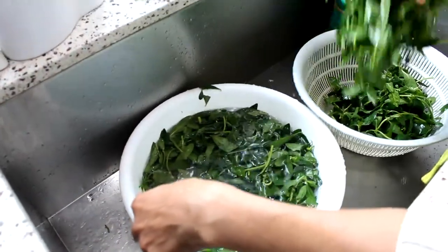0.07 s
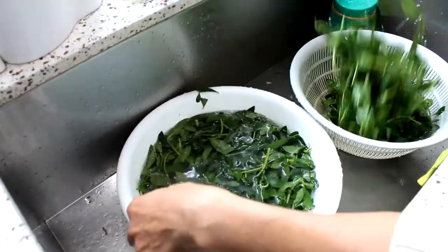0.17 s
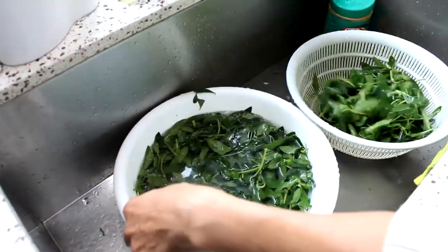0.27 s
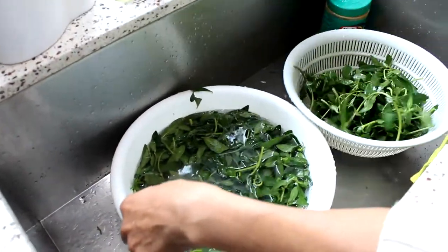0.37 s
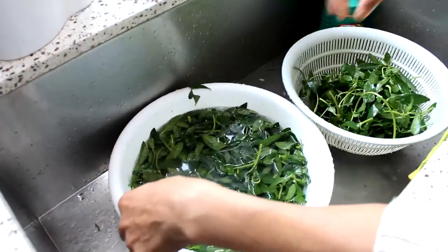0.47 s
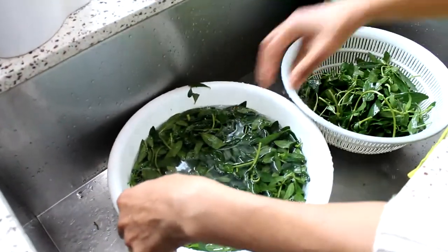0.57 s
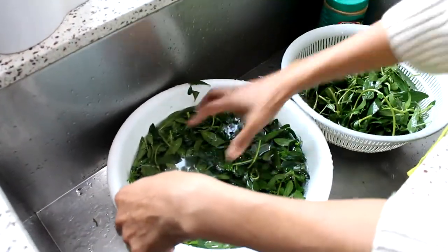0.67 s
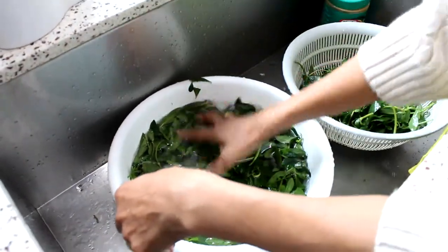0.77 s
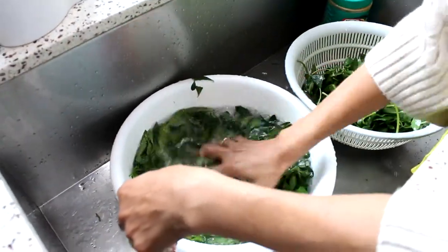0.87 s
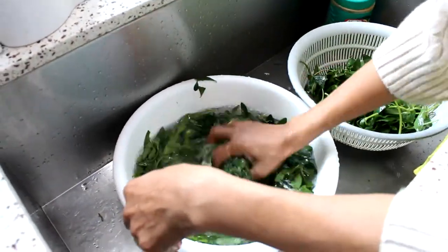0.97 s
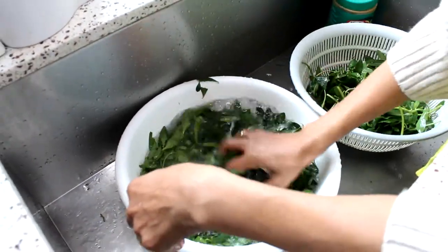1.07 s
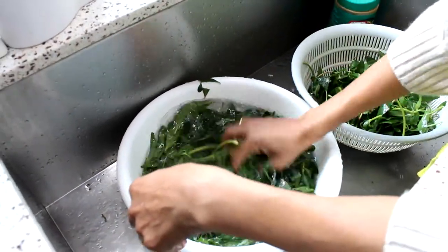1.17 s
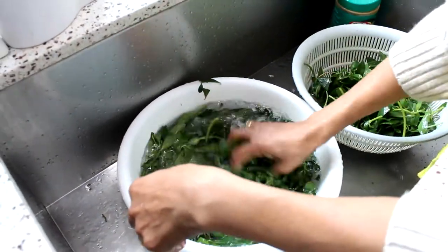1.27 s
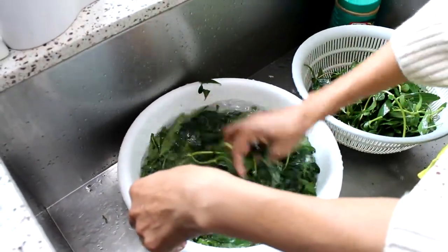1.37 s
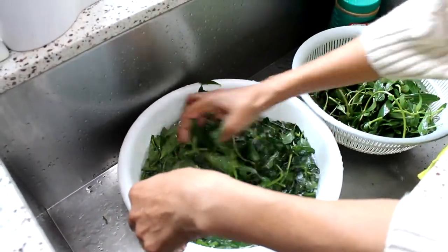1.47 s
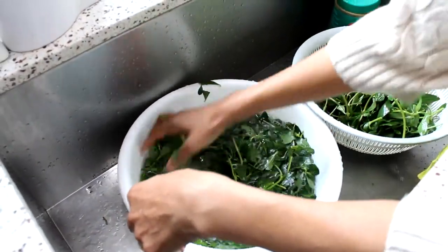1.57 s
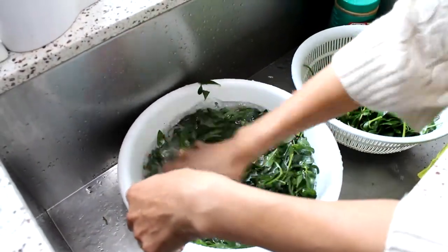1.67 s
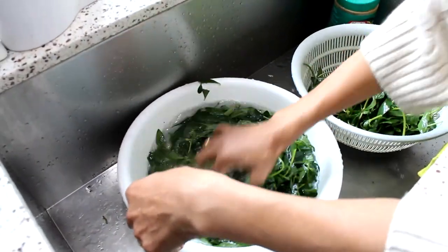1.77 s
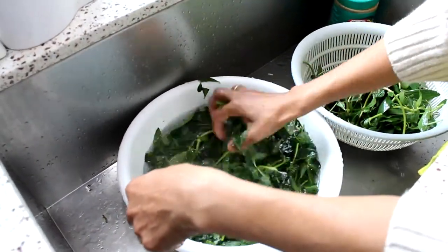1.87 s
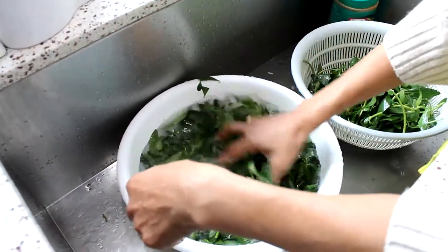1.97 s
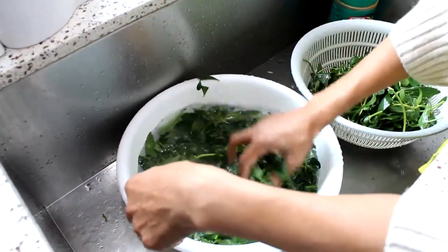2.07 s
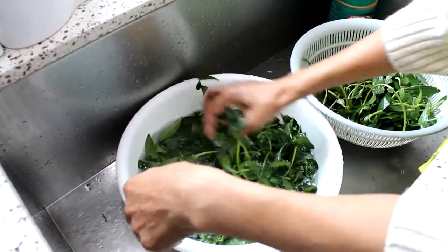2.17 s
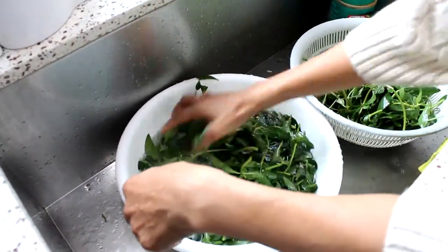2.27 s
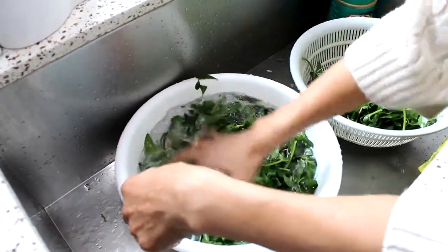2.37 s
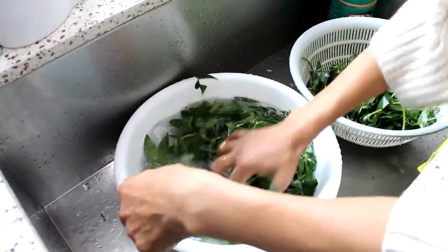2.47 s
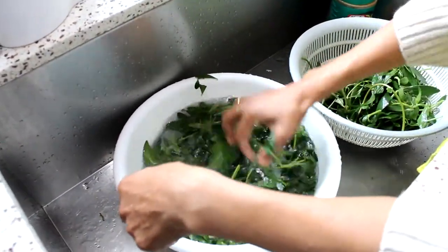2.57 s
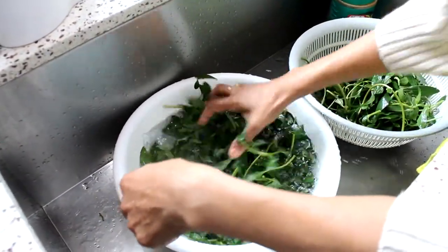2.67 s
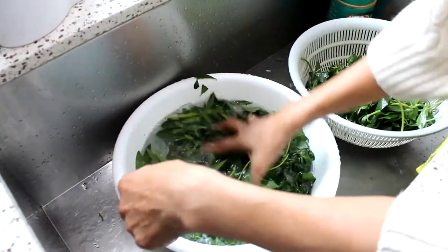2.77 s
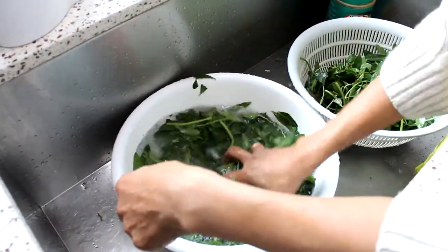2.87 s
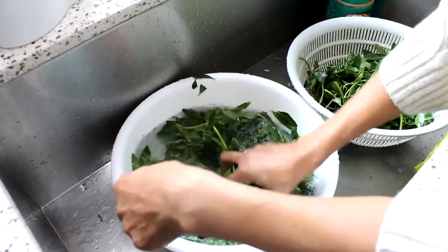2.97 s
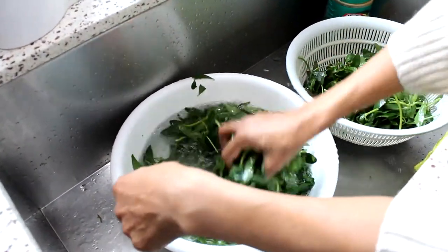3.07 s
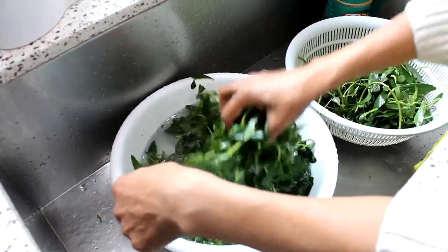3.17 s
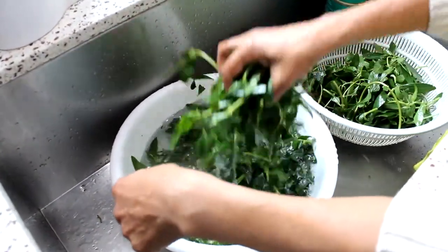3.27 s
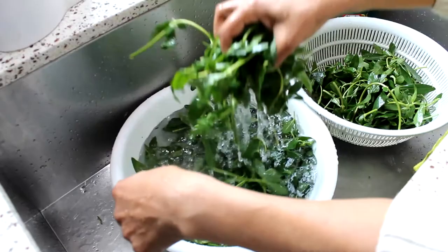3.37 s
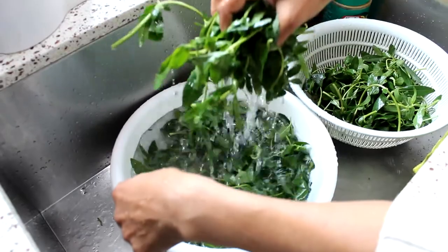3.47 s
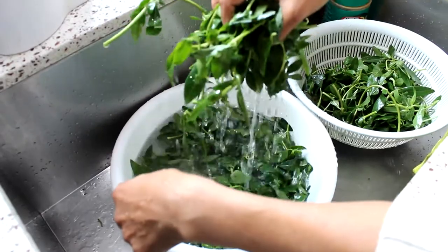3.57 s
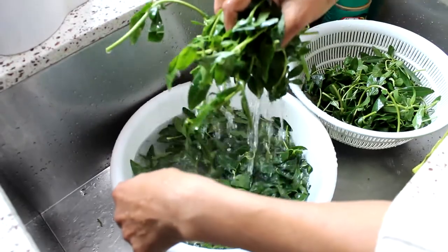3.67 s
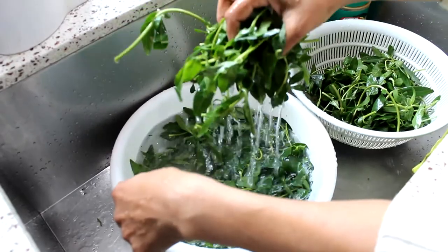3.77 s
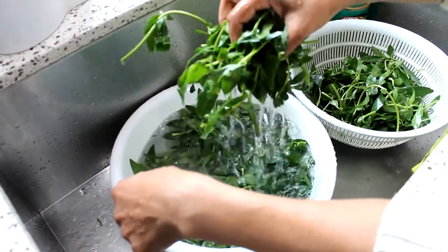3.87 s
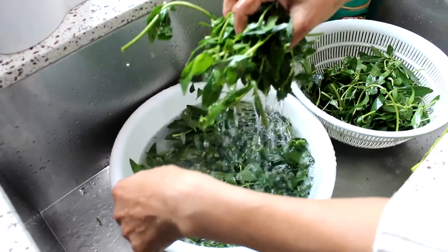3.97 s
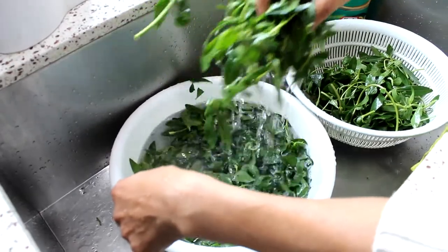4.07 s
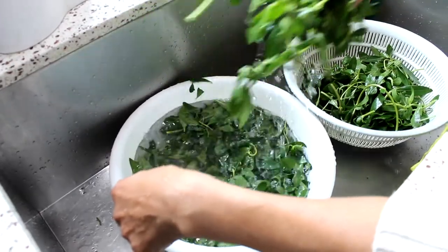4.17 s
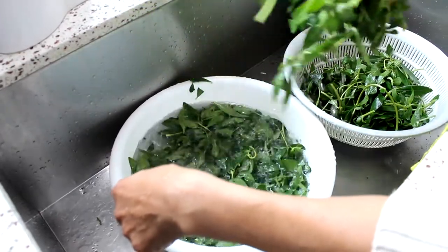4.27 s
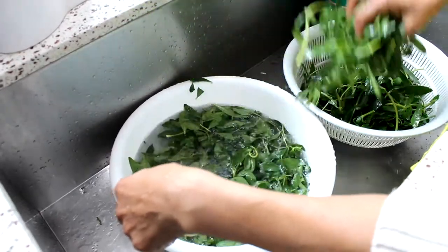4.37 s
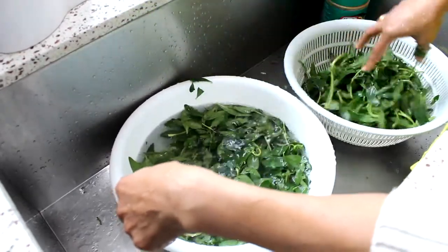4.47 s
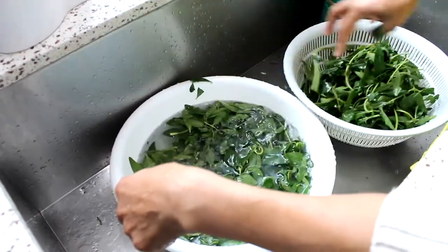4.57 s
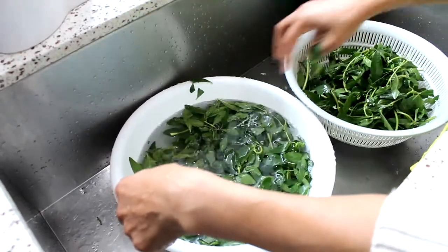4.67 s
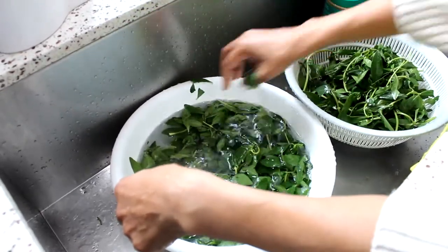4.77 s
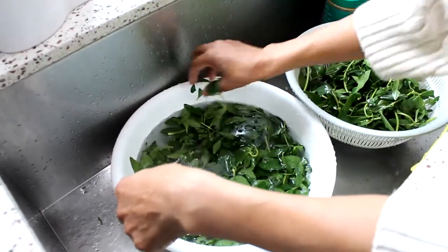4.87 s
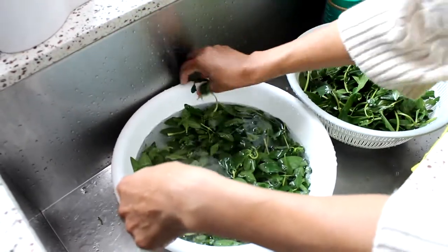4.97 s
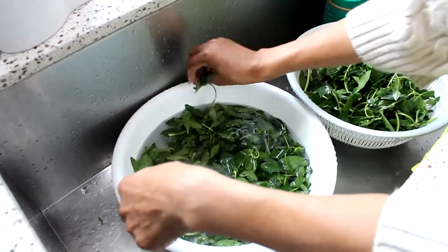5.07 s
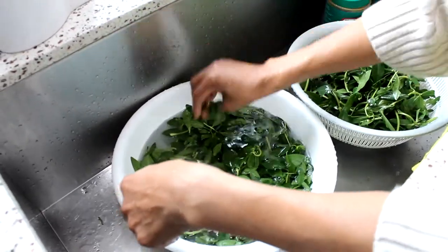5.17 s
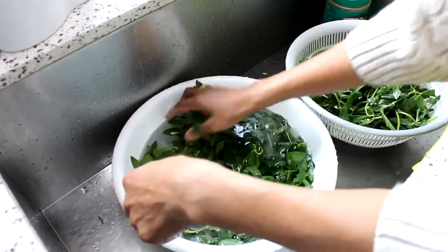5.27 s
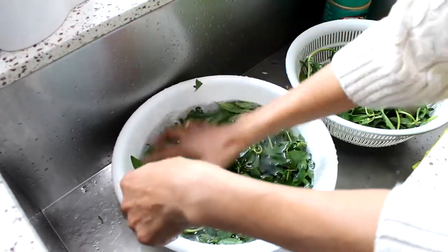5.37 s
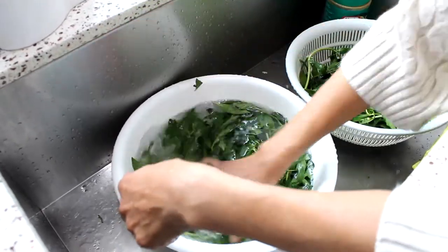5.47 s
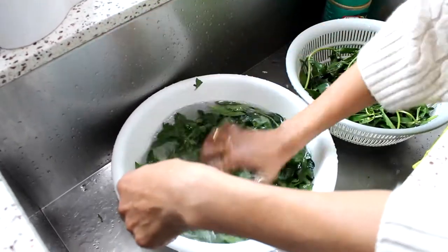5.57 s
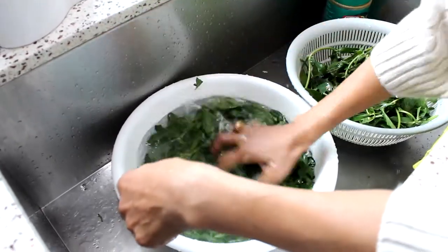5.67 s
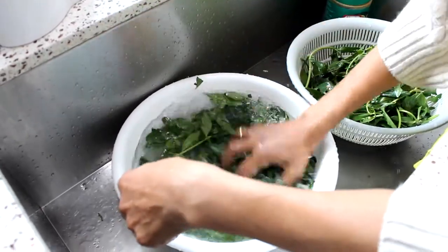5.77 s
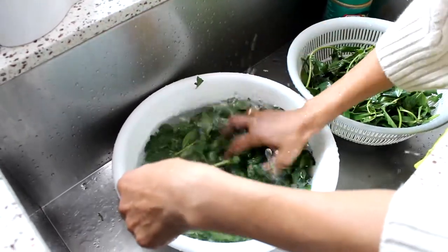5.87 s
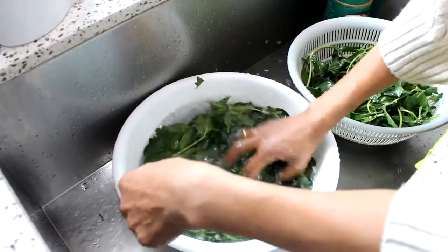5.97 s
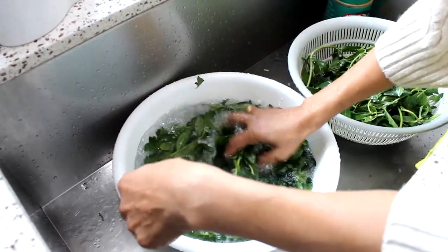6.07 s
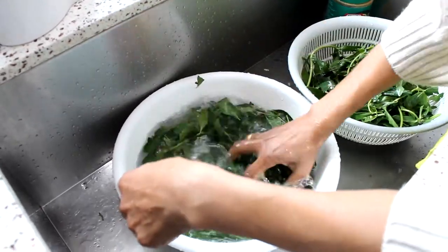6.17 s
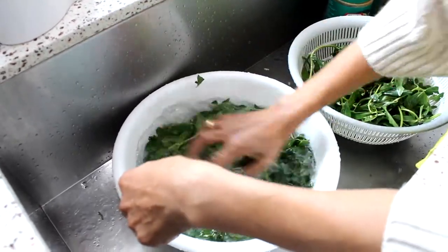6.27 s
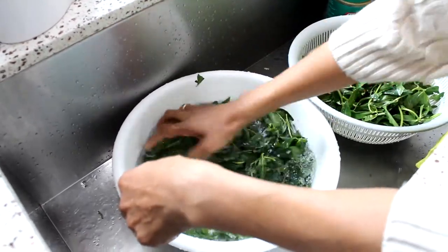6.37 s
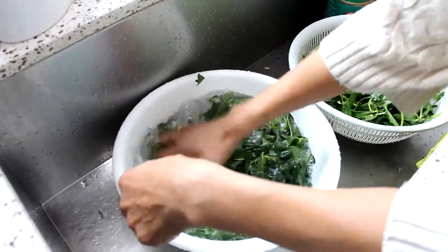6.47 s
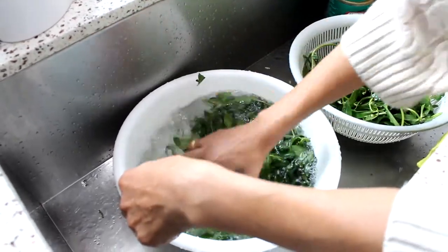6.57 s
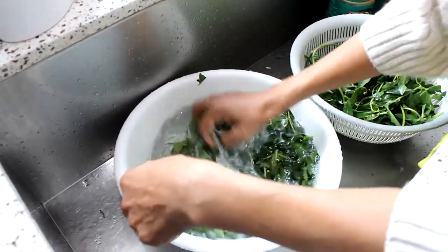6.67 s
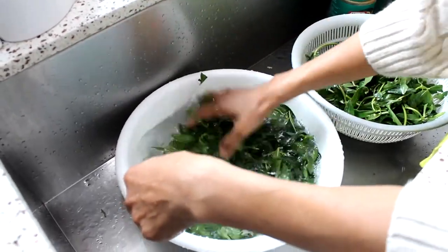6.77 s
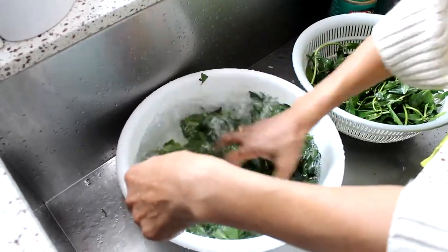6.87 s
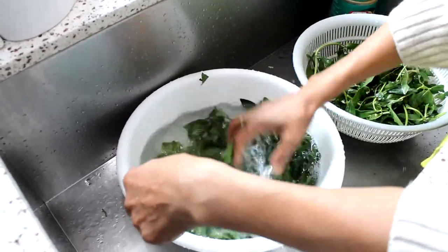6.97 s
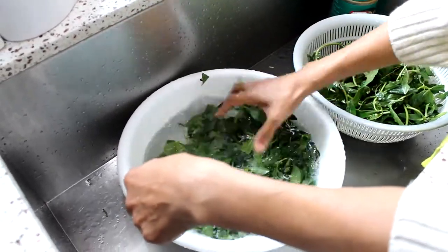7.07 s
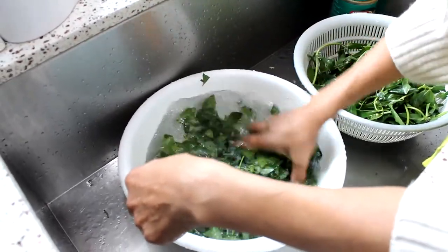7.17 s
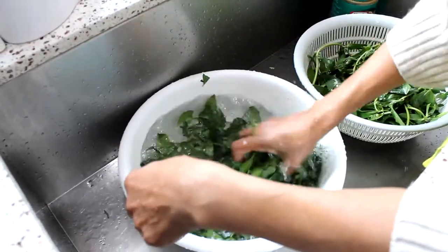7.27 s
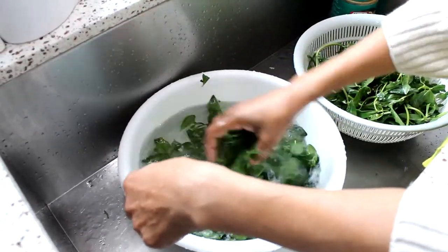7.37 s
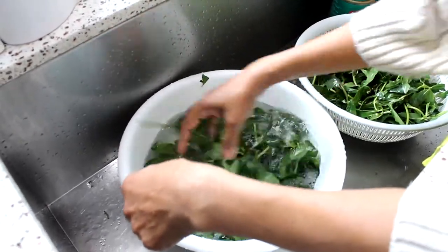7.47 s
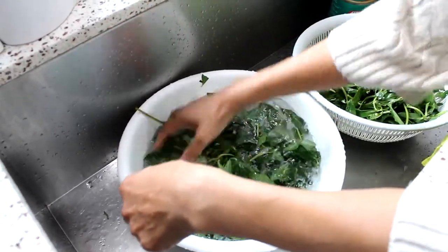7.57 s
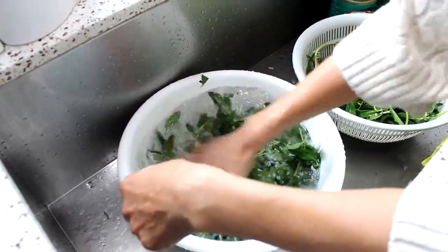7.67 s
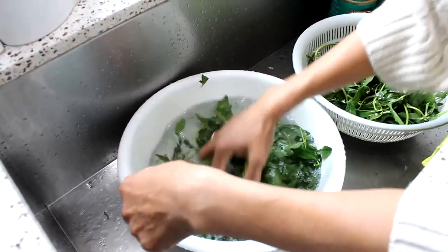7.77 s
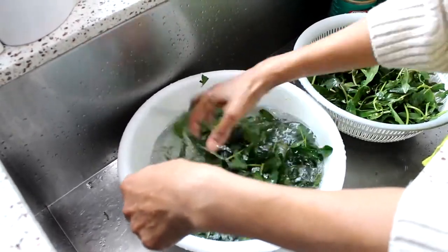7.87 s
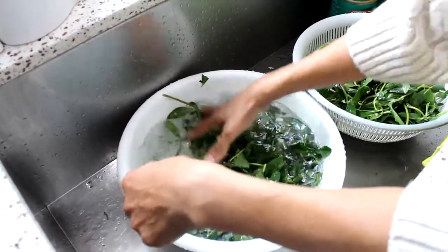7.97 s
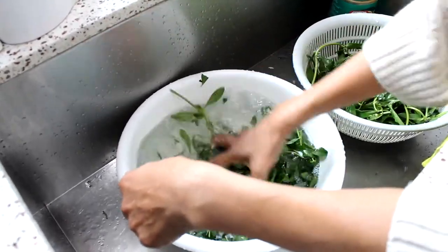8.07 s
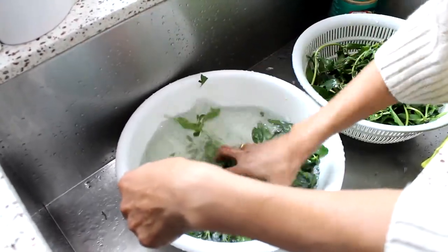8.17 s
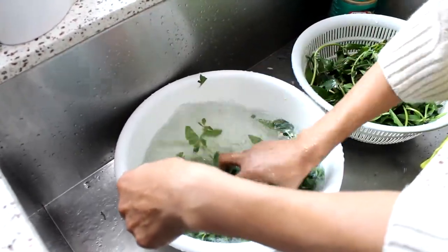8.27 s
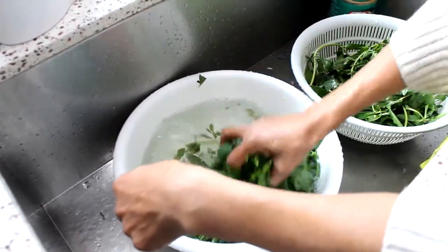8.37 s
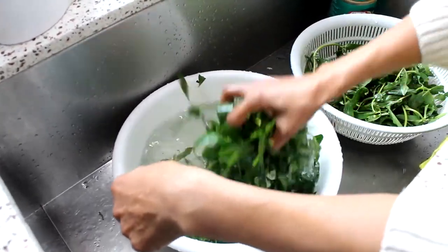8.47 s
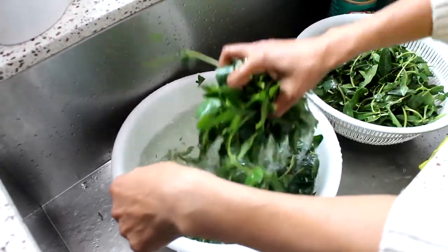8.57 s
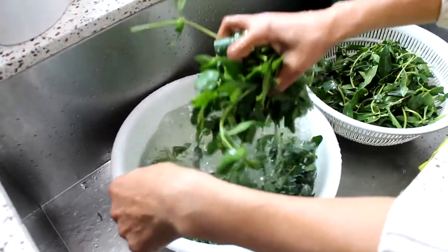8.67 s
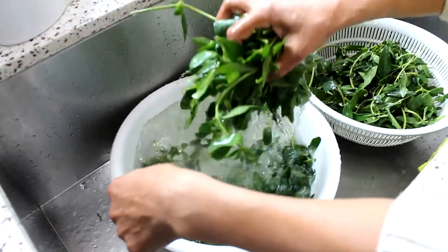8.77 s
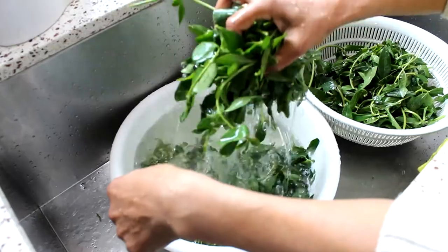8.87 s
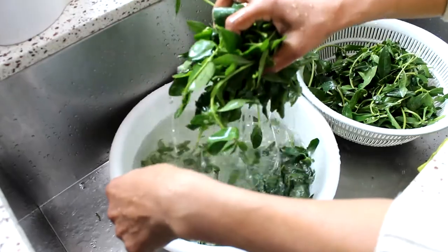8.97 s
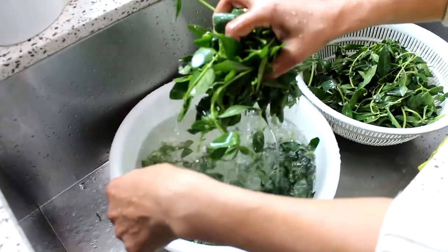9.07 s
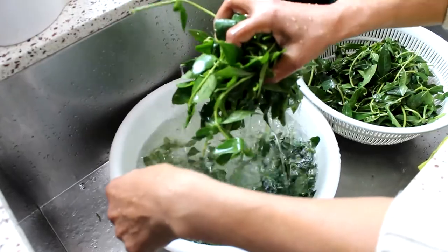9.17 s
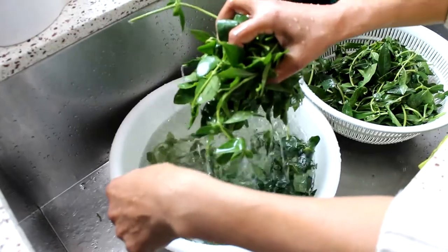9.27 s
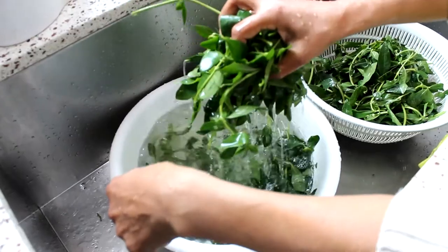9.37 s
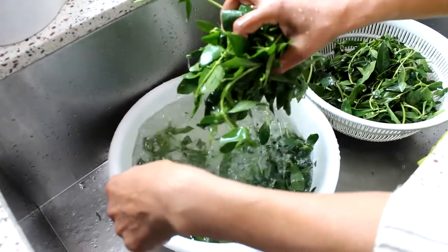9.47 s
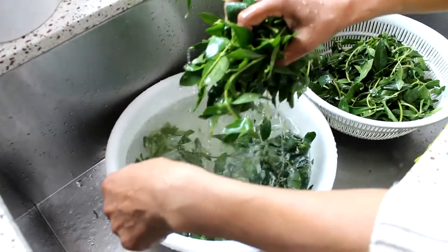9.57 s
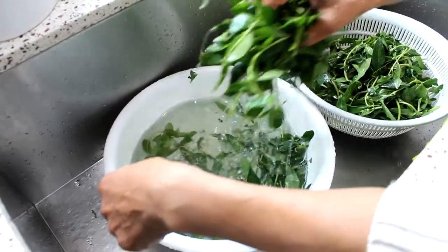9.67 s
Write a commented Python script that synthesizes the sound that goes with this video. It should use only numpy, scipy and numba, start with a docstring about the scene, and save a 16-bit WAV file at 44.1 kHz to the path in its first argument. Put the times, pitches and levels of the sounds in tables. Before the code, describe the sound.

Close up at a kitchen sink, a bunch of wet greens drops softly into a plastic colander, then a hand swishes more through a bowl of water. It is lifted and water streams down with plinking drips, a loud hollow thump follows as it lands, then harder, splashier stirring with knocks and gurgles leads to a second drain. Steel walls add bright short echoes over a low, steady room murmur.

```python
"""A hand swishes leafy greens in a plastic bowl of water that stands in a steel sink.
Each stroke stirs up clouds of bubbles: dying sines that climb in pitch. Slaps are short bursts of noise.
Twice a bunch is lifted and drains with plinking drips; bunches drop into a colander as grainy noise.
Bowl and colander knock on the sink floor, as groups of dying sines, and leaves and rim tick with noise.
The steel walls throw it all back, and the kitchen murmurs behind as steady coloured noise."""
import sys
import numpy as np
from scipy import signal
from scipy.fft import rfft, irfft
from scipy.io import wavfile
from scipy.ndimage import uniform_filter1d
from numba import njit

SR = 44100
rng = np.random.default_rng(int(sys.argv[2]) if len(sys.argv) > 2 else 0)


def put_to_file(sound):
    """Save the sound as 16-bit audio at rate SR, in the file named by the first command-line argument."""
    columns = np.atleast_2d(sound).T  # one column per channel
    safe = np.clip(columns, -1, 1)
    whole_steps = np.round(safe * 32767)
    wavfile.write(sys.argv[1], SR, whole_steps.astype(np.int16))


N = 428652

# Table levels are relative: the mix, the echoes and the gains in scene() shift them.
# steady kitchen background: [f/Hz, level per Hz/dB]
KITCHEN_COLOUR = [(25, -15), (60, -10), (110, -4.5), (170, -5.5), (300, -2), (420, -2), (540, -4),
                  (700, -10), (1400, -17.5), (4500, -27), (9500, -32), (15000, -48)]
KITCHEN_DB = -48.5
# light ticks: a faint rustle of the carried leaves (no ring), then ticks on the colander's rim: [t/s, scuff
# level/dB, ring level/dB]
LIGHT_TICKS = [(0.122, -48, -80), (0.269, -46.5, -46), (0.687, -40, -42)]
# knocks on bowl and colander, and at 0.448 s a stem tapping the colander: [t/s, sink floor thump level/dB,
# plastic clack level/dB]
KNOCKS = [(0.322, -35, -35), (0.448, -62, -37), (1.692, -32, -34.5), (3.635, -37, -45.5),
          (4.463, -34.5, -36), (4.586, -26, -39), (4.612, -28.5, -61), (5.076, -50, -37),
          (5.088, -30.5, -33), (5.15, -51, -35.5), (5.383, -40, -31), (6.538, -35, -31.5),
          (6.904, -36, -42), (7.27, -35.5, -45), (7.638, -46.5, -29.5), (8.218, -33, -28)]
# ringing tones of the loaded sink floor: [f/Hz, level/dB, t60/s]
SINK_MODES = [(70.8, -19, 1), (90.3, -15, 0.39), (116.9, -5.5, 0.37), (169.5, -6, 0.33), (189, -18, 0.17),
              (241, -8, 0.15), (326, -6.5, 0.06)]
# ringing tones of the plastic: [f/Hz, level/dB, t60/s]
PLASTIC_MODES = [(586.5, -11.5, 0.32), (810, -10, 0.11), (980, -14.5, 0.076), (1400, -15.5, 0.0088),
                 (2140, -13, 0.23), (2550, -9, 0.12), (4100, -14, 0.1)]
# a bunch lands in the colander: [t of the fullest rustle/s, level/dB, swell time/s, t60/s]
LANDINGS = [(0.356, -34, 0.048, 0.19), (4.599, -37.5, 0.068, 0.18)]
# colour of landing leaves: [f/Hz, level per Hz/dB]
LEAF_COLOUR = [(35, -14), (70, -6), (170, -6), (360, -7), (900, -14), (2200, -17), (4600, -18),
               (9100, -22.5), (15000, -46)]
# strokes of the hand through the water: [start t/s, length/s, splash level/dB,
# gurgle level above splash/dB, fizz level above splash/dB, t60 of the settling splash/s]
STROKES = [(0.897, 0.29, -29, -2.5, -9.5, 0.71), (1.275, 0.12, -32.5, -7, -7, 0.78),
           (1.658, 0.064, -41, -2.5, -8, .6), (1.765, 0.38, -32.5, -8.5, -6, 0.46),
           (2.457, 0.18, -32, -6, -7.5, 0.48), (2.757, .27, -38.5, -2, -12.5, 1),
           (5.51, 0.073, -38, -7.5, -4, 0.33), (5.597, 0.21, -24.5, -5.5, -9.5, 0.58),
           (5.953, 0.088, -27.5, -3, -7.5, 0.98), (6.181, 0.092, -27, -3.5, -9.5, 1),
           (6.601, 0.24, -29.5, -4, -9.5, 0.98), (6.928, 0.2, -31, -2.5, -6.5, 0.67),
           (7.265, 0.08, -28, -5.5, -12, 0.88), (7.731, 0.071, -28.5, 3, -10, 0.88),
           (8.138, 0.081, -33, 6, -7, 0.51)]
STROKE_ATTACK_S = 0.022
# the hand digs deeper as it goes: growth over one stroke
GURGLE_GROWTH_DB, SPLASH_GROWTH_DB, FIZZ_GROWTH_DB = 9, 4, 3.5
# large bubbles stop first, spray last: settling time as a multiple of that of the splash
GURGLE_T60_RATIO, FIZZ_T60_RATIO = 0.85, 1.9
# leaves hold water back and let it go in clumps: spread of the swings, and their pace
CLUMP_DB, CLUMPS_PER_S = 1.52, 14
# how steeply the number of bubbles follows the level: calm water has few, so they stand apart
BUBBLE_RATE_POWER = 0.65
# harder stirring traps larger bubbles: gentler gurgles ring higher
CALM_OCTAVES_PER_DB = 0.014
# colour of the water in the bowl: [f/Hz, level/dB]
WATER_COLOUR = [(200, -43), (400, 4), (520, -14), (620, 0), (760, -1.5), (1100, 4.5), (1400, 3), (2100, 5),
                (2750, 7), (4200, 6.5), (6000, 4), (9500, 5.5), (12000, -5.5), (15000, -17)]
# fingers, stems and falling water slap the surface: [t/s, level/dB, centre f/Hz]
SLAPS = [(0.899, -23.5, 1400), (1.273, -25, 1400), (1.778, -18, 1160), (2.06, -21.5, 3230),
         (2.477, -22.5, 1725), (2.796, -26, 1160), (3.002, -26, 7300), (3.079, -20, 2360),
         (3.641, -17, 4200), (4.022, -14.5, 3770), (4.277, -28, 5300), (5.543, -28, 5230), (6.1, -15, 5000),
         (6.313, -12, 1510), (6.371, -21.5, 2390), (6.653, -14, 2870), (7.385, -11, 770),
         (7.639, -13, 1510), (8.03, -25.5, 1400), (8.149, -17, 3190), (8.201, -11.5, 890),
         (8.29, -20, 3000), (8.322, -24.5, 3020), (8.489, -30.5, 1730), (8.934, -16, 2360),
         (9.456, -24.5, 5500), (9.664, -25.5, 1470)]
# the loudest single bubbles: [t/s, level/dB, starting f/Hz, t60/s]
PLOPS = [(1.005, -26.5, 820, 0.041), (1.14, -28, 615, .07), (1.271, -23.5, 1305, 0.045),
         (1.557, -27.5, 2064, 0.026), (2.22, -29, 2740, 0.034), (2.565, -22, 1780, 0.038),
         (2.796, -14.5, 860, 0.012), (2.968, -26.5, 3170, 0.024), (3.002, -22, 740, 0.019),
         (3.206, -32, 1785, 0.042), (3.379, -33.5, 2820, 0.037), (3.455, -35, 1600, 0.024),
         (3.643, -22, 787, 0.028), (3.757, -15.5, 2850, 0.016), (3.761, -14, 3760, 0.0079),
         (3.808, -13, 2723, 0.039), (3.86, -25.5, 1270, 0.033), (4.024, -21, 2620, 0.014),
         (4.112, -26, 750, 0.054), (5.62, -15, 2900, 0.0097), (5.756, -18, 1400, 0.035),
         (5.814, -17.5, 702, 0.037), (5.906, -10.5, 2770, 0.01), (5.915, -9, 1560, 0.0053),
         (5.995, -19.5, 2700, 0.017), (6.006, -18.5, 638, 0.052), (6.129, -22.5, 488, 0.09),
         (6.314, -13.5, 1744, 0.034), (6.367, -19, 1534, 0.026), (6.655, -13.5, 7330, 0.0027),
         (6.754, -18, 1430, 0.017), (6.77, -24, 1520, 0.015), (6.805, -28, 635, 0.15),
         (6.949, -11, 2130, 0.012), (7.014, -21.5, 995, 0.03), (7.397, -21.5, 855, 0.052),
         (7.804, -20, 811, 0.036), (7.87, -29, 617, 0.088), (7.918, -21, 1790, 0.025),
         (8.241, -14, 590, 0.028), (8.933, -26, 790, 0.053), (8.933, -17, 4250, 0.012),
         (8.966, -26, 1455, .087), (9.106, -28, 968, 0.053), (9.228, -24.5, 1624, 0.091),
         (9.337, -27.5, 1330, 0.04), (9.461, -22, 5680, 0.018), (9.47, -30, 883, 0.073),
         (9.552, -31, 840, 0.069), (9.661, -33, 1050, 0.043)]
# a bunch is lifted and drains:
# [t at which the stream is full/s, time it stays full/s, splash level/dB, t60 of the dwindling stream/s]
LIFTS = [(3.622, .5, -37, 0.83), (8.88, 0.38, -35.5, 2.46)]
LIFT_SWELL_DB_PER_S = 32
LIFT_LEAD_S = 0.41  # the leaves break the surface this long before the stream is full
# levels of the stream's gurgle and fizz, above its splash
STREAM_GURGLE_DB, STREAM_FIZZ_DB = 1, -2
# the longer it pours, the more it gurgles; gurgling needs a strong flow
STREAM_GURGLE_GROWTH_DB, STREAM_GURGLE_POWER = 10, 1.5
# first echoes off the bowl and the steel walls: [delay/s, gain/1]
ECHOES = [(.0052, 0.037), (.0117, 0.076)]
# ring-out of sink and kitchen: [f/Hz, t60/s]
TAIL_T60 = [(200, 0.14), (2000, 0.51), (10000, 0.17)]


def from_db(db):
    """Turns decibels into a plain factor."""
    return 10 ** (np.asarray(db) / 20)


def rms_one(x):
    """Scales a sound to an average (RMS) strength of 1."""
    return x / np.sqrt(np.mean(x ** 2) + 1e-20)


def at_hz(points, hz):
    """Reads a table on a log-frequency axis."""
    known_hz, values = np.transpose(points)
    return np.interp(np.log(np.maximum(hz, 1)), np.log(known_hz), values)


def band(x, low_hz, high_hz):
    """Keeps mainly the frequencies between two limits."""
    limits = [low_hz, min(high_hz, SR / 2 - 1)]
    return signal.sosfilt(signal.butter(2, limits, "band", fs=SR, output="sos"), x)


def coloured(x, spectrum, size=4096):
    """Filters a sound to follow a spectrum in dB, without sounding ahead of time (minimum phase)."""
    cepstrum = irfft(np.log(from_db(at_hz(spectrum, np.fft.rfftfreq(size, 1 / SR)))))
    # folding the second half onto the first makes the filter respond as early as it can
    cepstrum[1:size // 2] *= 2
    cepstrum[size // 2 + 1:] = 0
    return signal.oaconvolve(x, irfft(np.exp(rfft(cepstrum))))[:N]


def fade(t, t60):
    """Dies away by 60 dB in t60 seconds."""
    return np.exp(-np.log(1000) * t / t60)


def add(out, s, sound):
    """Mixes a sound in from time s."""
    start = max(round(s * SR), 0)
    out[start:start + len(sound)] += sound[:N - start]


def kitchen_murmur():
    """The steady background of the kitchen: noise with a fixed colour, strongest in the lows."""
    return from_db(KITCHEN_DB) * rms_one(coloured(rng.standard_normal(N), KITCHEN_COLOUR))


def leaf_ticks(per_s, tick_db, spread_db, tick_t60):
    """Wet leaves and stems shift and tick faintly all along: short fades of bright noise."""
    when, size = rng.random((int(per_s * N / SR), 2)).T
    strength, t = np.zeros(N), np.arange(SR // 20) / SR
    for s, db in zip(when * N / SR, tick_db - spread_db * size):
        add(strength, s, from_db(db) * fade(t, tick_t60))
    # filtered twice for steeper edges
    bright_noise = band(band(rng.standard_normal(N), 4500, 11000), 4500, 11000)
    return strength * rms_one(bright_noise)


def light_ticks(ring_hz, ring_t60, scuff_t60):
    """A bright scuff of noise with a thin, rough high ring made of very narrow noise."""
    out, t = np.zeros(N), np.arange(SR // 2) / SR
    for s, scuff_db, ring_db in LIGHT_TICKS:
        scuff = rms_one(band(rng.standard_normal(len(t)), 1500, 7000)) * fade(t, scuff_t60)
        narrow_noise = band(rng.standard_normal(len(t)), ring_hz * 0.985, ring_hz * 1.015)
        ring = rms_one(narrow_noise) * fade(t, ring_t60)
        add(out, s, from_db(scuff_db) * scuff + from_db(ring_db) * ring)
    return out


def struck(modes, t, split):
    """One blow: every mode is a cluster of close partials that beat, each with a strength of its own."""
    out = np.zeros(len(t))
    for hz, db, t60 in modes:
        detunes = rng.uniform(-1.03, 1, size=4)
        strengths = rng.standard_normal(size=4)
        signs = rng.choice([-1, 1], size=4)
        for detune, strength, sign in zip(detunes, strengths, signs):
            partial = np.sin(2 * np.pi * hz * (1 + split * detune) * t)
            out += sign * from_db(db + 2 * strength) * partial * fade(t, t60)
    # the force of the blow sets the total energy
    energy = sum(from_db(db) ** 2 * t60 * SR / (4 * np.log(1000)) for hz, db, t60 in modes)
    return out * np.sqrt(energy) / np.linalg.norm(out)


def knocks(crack_db, crack_t60):
    """The plastic clacks, and a heavy knock sets the sink floor booming."""
    out, t = np.zeros(N), np.arange(SR // 2) / SR
    for s, thump_db, clack_db in KNOCKS:
        crack_noise = rms_one(band(rng.standard_normal(len(t)), 400, 2200))
        crack = from_db(crack_db) * crack_noise * fade(t, crack_t60)
        add(out, s, from_db(thump_db) * struck(SINK_MODES, t, split=0.11))
        add(out, s, from_db(clack_db) * (struck(PLASTIC_MODES, t, split=0.08) + crack))
    return out


def landings(grain_db):
    """Countless leaves touch down: a soft, grainy rustle of noise that swells and settles."""
    t, level = np.arange(N) / SR, np.zeros(N)
    for s, db, swell_s, t60 in LANDINGS:
        swell = np.exp(np.minimum(t - s, 0) / swell_s)
        level += from_db(db) * swell * fade(np.maximum(t - s, 0), t60)
    # fast random swings in level make the rustle grainy
    grain = from_db(grain_db * rms_one(band(rng.standard_normal(N), 40, 360)))
    return level * rms_one(coloured(grain * rng.standard_normal(N), LEAF_COLOUR))


def stirring():
    """Levels of gurgle, splash and fizz: each stroke sets in quickly, grows as the hand digs in, settles."""
    t, power = np.arange(N) / SR, np.zeros((3, N))
    for s, length_s, db, gurgle_db, fizz_db, t60 in STROKES:
        age = np.maximum(t - s, 0)
        attack = np.minimum(age / STROKE_ATTACK_S, 1)
        to_go = np.maximum(1 - age / length_s, 0)
        after = np.maximum(age - length_s, 0)
        gurgle = from_db(db + gurgle_db - GURGLE_GROWTH_DB * to_go) * fade(after, t60 * GURGLE_T60_RATIO)
        splash = from_db(db - SPLASH_GROWTH_DB * to_go) * fade(after, t60)
        fizz = from_db(db + fizz_db - FIZZ_GROWTH_DB * to_go) * fade(after, t60 * FIZZ_T60_RATIO)
        power += (attack * np.array([gurgle, splash, fizz])) ** 2
    return np.sqrt(power)


def clumps():
    """Quick random swings in dB, one for each size of bubble."""
    steps = rng.standard_normal((1000, 3)).T
    # two random points make one swing up and down
    position = np.arange(N) / SR * CLUMPS_PER_S * 2
    return CLUMP_DB * np.array([np.interp(position, np.arange(len(row)), row) for row in steps])


@njit
def ring_bubbles(born_s, height, hz, t60, rise):
    """Each bubble is a dying sine whose pitch climbs by the share `rise` as it nears the surface."""
    out = np.zeros(N)
    for k in range(len(born_s)):
        start, length = int(born_s[k] * SR), int(t60[k] * SR)
        loss, size, phase = 1000.0 ** (-1 / length), height[k], 0.0
        for i in range(min(length, N - start)):
            phase += 2 * np.pi * hz[k] / SR * (1 + rise * i / length)
            # the first two cycles fade in
            out[start + i] += size * np.sin(phase) * min(phase / (4 * np.pi), 1.0)
            size *= loss
    return out


def bubble_cloud(level_db, low_hz, high_hz, per_s, cycles, spread_db, rise, hiss, even_s, octaves_per_db=0):
    """Random bubbles of one size class, many weak and few strong; harder stirring makes more of them."""
    when, chance, pitch, size, damping = rng.random((60000, 5)).T
    born_s = when * N / SR
    calm_db = (level_db.max() - level_db)[(when * N).astype(int)]
    busy = from_db(-BUBBLE_RATE_POWER * calm_db)
    # per_s is the rate at the loudest moment
    kept = chance < per_s * busy * N / SR / len(when)
    hz = low_hz * (high_hz / low_hz) ** pitch * 2 ** (octaves_per_db * calm_db)
    height = from_db(spread_db * np.minimum(-np.log(1 - size), 4))
    t60 = cycles / hz * 2 ** (damping - 0.5)
    cloud = ring_bubbles(born_s[kept], height[kept], hz[kept], t60[kept], rise)
    # films tear and droplets scatter around each bubble
    activity = np.sqrt(np.abs(uniform_filter1d(cloud ** 2, size=192)))
    cloud = cloud + hiss * activity * rms_one(band(rng.standard_normal(N), low_hz, high_hz))
    # the bubbles of one moment share the energy of the stroke
    power = np.abs(uniform_filter1d(cloud ** 2, int(even_s * SR)))
    return from_db(level_db) * cloud / np.sqrt(power + np.mean(power) / 1000)


def water(sway_db):
    """Gurgles under the hand, splashes on top, fizz from spray and leaves; the load shakes the sink floor."""
    flow_db = 20 * np.log10(np.hypot(stirring(), draining()) + 1e-9)
    gurgle_db, splash_db, fizz_db = flow_db + clumps()
    gurgle = bubble_cloud(gurgle_db - 2.5, 483.2, 1200, per_s=300, cycles=41.5, spread_db=3.0,
                          rise=0.21, hiss=0.65, even_s=0.041, octaves_per_db=CALM_OCTAVES_PER_DB)
    splash = bubble_cloud(splash_db - 5.0, 1295.0, 4613, per_s=1100, cycles=37.5, spread_db=4.0,
                          rise=0.31, hiss=0.31, even_s=0.047)
    fizz = bubble_cloud(fizz_db - 3.5, 4340, 13900, per_s=4000, cycles=47, spread_db=7.5,
                        rise=0.2, hiss=0.73, even_s=0.079)
    # noise keeps the floor ringing, as loudly as the water splashes
    floor_ring = struck(SINK_MODES, np.arange(SR // 2) / SR, split=0.078)
    floor_rumble = rms_one(signal.oaconvolve(rng.standard_normal(N), floor_ring)[:N])
    sway = from_db(splash_db + sway_db) * floor_rumble
    return coloured(gurgle + splash + fizz, WATER_COLOUR) + sway


def slaps(burst_t60, spray_db, spray_t60):
    """A sharp wet smack of noise, then its spray falls back as a longer fade of the same noise."""
    out, t = np.zeros(N), np.arange(SR // 5) / SR
    for s, level_db, hz in SLAPS:
        smack = rms_one(band(rng.standard_normal(len(t)), hz * 0.63, hz * 1.26))
        envelope = fade(t, burst_t60) + from_db(spray_db) * fade(t, spray_t60)
        add(out, s, 0.5 * from_db(level_db) * smack * envelope)
    return out


def plops(rise, gain_db, spatter_db, spatter_t60):
    """The loudest bubbles: rising, dying sines, each pinched off with a short spatter of noise."""
    s, level_db, hz, t60 = np.transpose(PLOPS)
    out = ring_bubbles(s, from_db(level_db), hz, np.maximum(t60, 0.004), rise)
    t = np.arange(SR // 20) / SR
    for when, db, pitch in zip(s, level_db, hz):
        spatter = rms_one(band(rng.standard_normal(len(t)), pitch * 0.65, min(pitch * 2, 9500)))
        add(out, when, from_db(db + spatter_db) * spatter * fade(t, spatter_t60))
    return from_db(gain_db) * out


def draining():
    """Levels of gurgle, splash and fizz: the stream swells as the bunch rises, holds, then dwindles."""
    t, levels = np.arange(N) / SR, np.zeros((3, N))
    for full_s, hold_s, db, t60 in LIFTS:
        swell = from_db(LIFT_SWELL_DB_PER_S * np.minimum(t - full_s, 0)) * (t > full_s - LIFT_LEAD_S)
        flow = swell * fade(np.maximum(t - full_s - hold_s, 0), t60)
        to_go = np.clip(1 - (t - full_s) / hold_s, 0, 1)
        gurgle_gain = from_db(STREAM_GURGLE_DB - STREAM_GURGLE_GROWTH_DB * to_go)
        gurgle = gurgle_gain * flow ** STREAM_GURGLE_POWER
        levels += from_db(db) * np.array([gurgle, flow, from_db(STREAM_FIZZ_DB) * flow])
    return levels


def drips(per_s, drip_db, spread_db, low_hz, high_hz, cycles, rise):
    """Lone drops fall from the lifted leaves and plink, ringing for more cycles than churned bubbles."""
    when, chance, pitch, size = rng.random((2000, 4)).T
    flow = draining()[1]
    flow = (flow / flow.max())[(when * N).astype(int)]
    # a stronger stream sheds more drops, and louder ones
    kept = chance < per_s * flow ** 0.3 * N / SR / len(when)
    hz = low_hz * (high_hz / low_hz) ** pitch
    height = from_db(drip_db - spread_db * size) * flow ** 0.25
    return ring_bubbles(when[kept] * N / SR, height[kept], hz[kept], cycles / hz[kept], rise)


def sink(x, basin_db, basin_t60, tail_db):
    """A few hard echoes, a quick flutter between the steel walls, then the kitchen's tail."""
    t = np.arange(SR // 2) / SR
    edges = np.geomspace(60, 16000, 9)
    tail = np.zeros(len(t))
    # each band of the tail dies away at its own pace
    for low, high in zip(edges, edges[1:]):
        tail += band(rng.standard_normal(len(t)), low, high) * fade(t, at_hz(TAIL_T60, np.sqrt(low * high)))
    tail *= t > 0.008
    flutter = rng.standard_normal(len(t)) * fade(t, basin_t60) * (t > 0.003)
    response = from_db(tail_db) * tail / np.linalg.norm(tail)
    response += from_db(basin_db) * flutter / np.linalg.norm(flutter)
    for delay_s, gain in ECHOES:
        response[round(delay_s * SR)] += gain
    # the low walls reflect little of the long waves
    response = band(response, 300, 12000)
    response[0] += 1  # the direct sound
    return signal.oaconvolve(x, response / np.linalg.norm(response))[:N]


def around_the_bowl(x, count):
    """Sounds come from ever new spots in the bowl, and each spot has its own reflections."""
    hop = SR // 30
    spots = rng.integers(0, count, N // hop + 1)
    out = np.zeros(N)
    for k in range(count):
        # the sound glides from spot to spot
        share = np.interp(np.arange(N) / hop, np.arange(len(spots)), spots == k)
        out += sink(x * share, basin_db=-2.5, basin_t60=0.042, tail_db=-8.5)
    return out


def scene():
    """Mixes washing and handling in the sink, with the kitchen behind."""
    handling = leaf_ticks(per_s=7, tick_db=-48, spread_db=12, tick_t60=0.063)
    handling += light_ticks(ring_hz=9840, ring_t60=0.086, scuff_t60=0.13)
    handling += knocks(crack_db=1.5, crack_t60=0.066)
    handling += landings(grain_db=2.0)
    washing = water(sway_db=-22)
    washing += slaps(burst_t60=0.012, spray_db=-4.5, spray_t60=0.16)
    washing += plops(rise=0.054, gain_db=7.5, spatter_db=-13.0, spatter_t60=0.019)
    washing += drips(per_s=28, drip_db=-24.5, spread_db=27, low_hz=1050, high_hz=4160, cycles=79, rise=0.1)
    return (around_the_bowl(washing + handling, count=5) + kitchen_murmur())[None]


def record(dry):
    """Cuts the treble steeply above 15.2 kHz."""
    return signal.sosfilt(signal.ellip(10, 0.1, 80, 15200, fs=SR, output="sos"), dry)


dry = scene()
out = record(dry)
put_to_file(out)
```